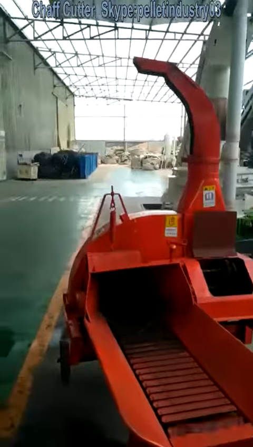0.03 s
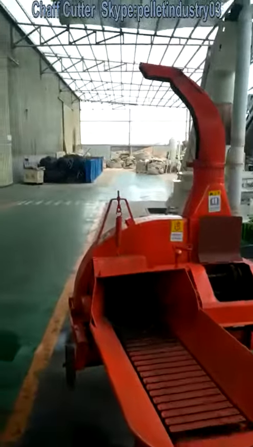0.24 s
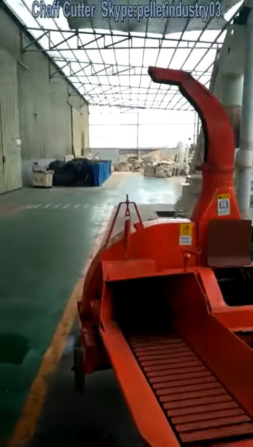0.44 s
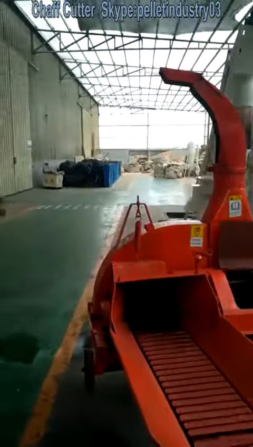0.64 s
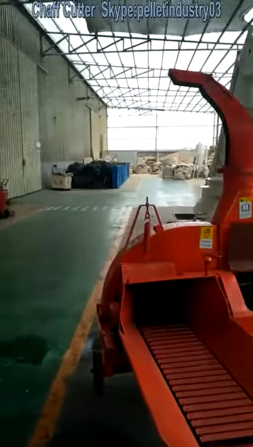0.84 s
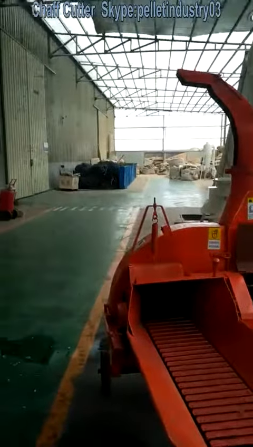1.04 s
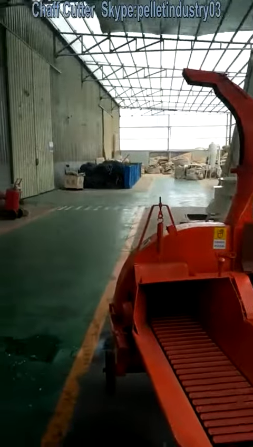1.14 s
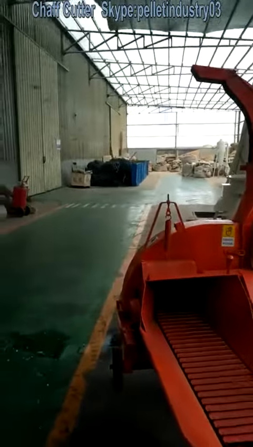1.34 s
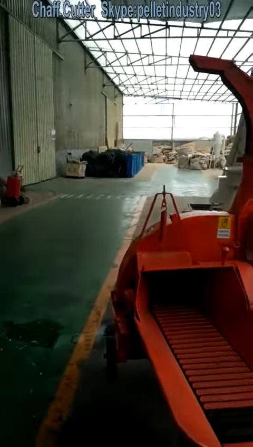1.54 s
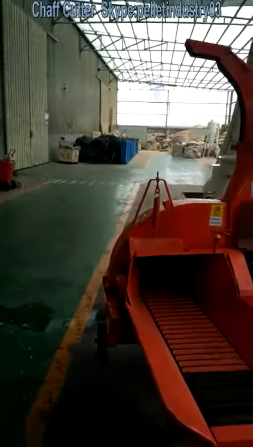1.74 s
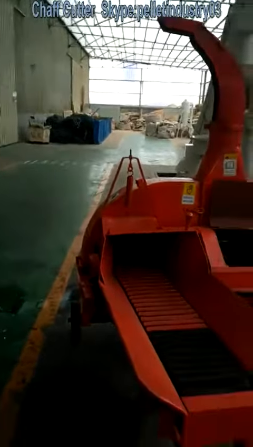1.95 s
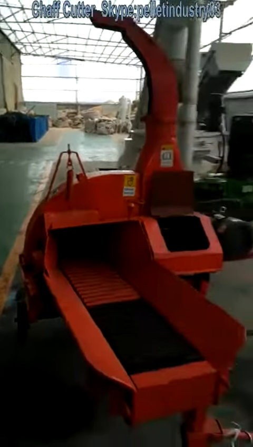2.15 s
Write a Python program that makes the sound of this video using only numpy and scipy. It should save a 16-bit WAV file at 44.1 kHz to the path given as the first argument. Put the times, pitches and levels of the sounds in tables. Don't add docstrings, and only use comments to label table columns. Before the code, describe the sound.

A chaff cutter runs empty, close to a phone in a large shed. Silence until 0.2 s, then a full, noisy roar with low blade-wheel throb swells to about 0.68 s. Noise suppression drops it sharply within a tenth of a second, and the treble keeps thinning. From 0.83 s, bright scraping chain clanks tick irregularly about fourteen times a second, with soft housing knocks and slight reverberation.

```python
import sys
import numpy as np
from scipy import signal
from scipy.fft import rfft, irfft
from scipy.io import wavfile
from scipy.ndimage import uniform_filter1d

SR = 44100
rng = np.random.default_rng(int(sys.argv[2]) if len(sys.argv) > 2 else 0)


def unload_wav(signal):
    wavfile.write(
        sys.argv[1],
        SR,
        np.round(np.clip(np.atleast_2d(signal).T, -1, 1) * 32767).astype(np.int16),
    )


def voltage_ratio(decibels):
    exponent = np.asarray(decibels, float) / 20
    return 10 ** exponent


N = 97020

WHEEL_HZ = 40.39
OPENS_S = 0.2035
SPLIT_HZ = 4850


def level(x, db):
    return x * voltage_ratio(db) / np.sqrt(np.mean(x ** 2))


def read(table, hz, axis=1):
    table = np.array(table, float)
    return np.interp(np.log(hz), np.log(table[:, 0]), table[:, axis])


def walk(rate):
    hold = int(SR / rate)
    steps = np.repeat(rng.standard_normal(N // 100)[:N // hold + 1], hold)
    slewed = uniform_filter1d(uniform_filter1d(steps, hold), hold)[:N]
    return slewed / slewed.std()


def resonance(x, hz, width_hz):
    return signal.lfilter(*signal.iirpeak(hz, hz / width_hz, fs=SR), x)


def blade_wheel(t, phase):
    # multiple, level_db
    wheel_orders = [(1, -22.5), (2, -7.5), (3, -12.5), (4, -1), (5, -8), (6, -9)]
    wheel_db, wobble_db = -32, 0.8
    out = np.zeros(N)
    for multiple, order_db in wheel_orders:
        gain_db = wheel_db + order_db + wobble_db * walk(11.8) + recorder_db(multiple * WHEEL_HZ, t)
        out += voltage_ratio(gain_db) * np.sin(multiple * phase + rng.uniform(0, 2 * np.pi))
    return out


def roar(t, phase, throb_db):
    # pitch_hz, density_db
    roar_colour = [(25, -42), (60, -14.5), (160, -5), (500, -11), (900, -6.5), (5300, -15.5), (10800, -18),
                   (15300, -14)]
    roar_db, flicker_db = -22.5, 1.3
    swell_db = 1.01 * walk(10.28)
    treble_throb_db = 1.4 * np.cos(phase + 0.5)
    f = np.arange(N // 2 + 1) * SR / N + 1e-3
    coloured = irfft(rfft(rng.standard_normal(N)) * voltage_ratio(read(roar_colour, f)), N)
    spectrum = rfft(level(coloured, roar_db))
    out = np.zeros(N)
    lowest, highest = -16, 4
    for band in range(lowest, highest + 1):
        hz = SPLIT_HZ * 2 ** ((band + 0.5) / 2.5)
        mask = np.abs(np.log2(f / hz) * 2.5) < 0.5
        if band == lowest:
            mask |= f < hz
        if band == highest:
            mask |= f > hz
        beat_db = throb_db if hz < SPLIT_HZ else treble_throb_db
        gain_db = beat_db + swell_db + flicker_db * walk(25.16) + recorder_db(hz, t)
        out += irfft(spectrum * mask, N) * voltage_ratio(gain_db)
    return out


def housing(t, throb_db):
    # pitch_hz, width_hz, level_db
    housing_modes = [(279.2, 79, -41), (375.7, 56, -41), (769.5, 47, -43.5), (924, 250, -38),
                     (1238, 224, -38), (2016, 490, -36), (4080, 880, -36.5), (14660, 1600, -36)]
    out = np.zeros(N)
    for hz, width_hz, mode_db in housing_modes:
        tone = resonance(resonance(rng.standard_normal(N), hz, width_hz), hz, width_hz)
        out += level(tone, mode_db) * voltage_ratio(throb_db + 1.8 * walk(14) + recorder_db(hz, t))
    return out


def machine(t):
    phase = 2 * np.pi * np.cumsum(WHEEL_HZ * (1 + 0.0015 * walk(2.1))) / SR
    throb_db = 0.6 * np.cos(phase)
    return blade_wheel(t, phase) + roar(t, phase, throb_db) + housing(t, throb_db)


def scrape_grit(rattle):
    # pitch_hz, level_db
    scrape_colour = [(2500, -6), (4000, -3), (7000, -10), (10500, -7.5), (13000, -2.5), (15500, 2.5)]
    patch_db, band_hz = 3, 1500
    f = np.arange(N // 2 + 1) * SR / N + 1e-3
    spectrum = rfft(rattle) * voltage_ratio(read(scrape_colour, f))
    grit = np.zeros(N)
    for hz in range(2000, 18000, band_hz):
        patch = irfft(spectrum * np.exp(-((f - hz) / band_hz) ** 2), N)
        grit += voltage_ratio(patch_db * walk(33)) * patch
    return level(grit, 0)


def chain():
    # start_s, level_db, low_ring_db, high_ring_db, low_ring_hz
    clanks = [(0.834, -36, -8, -20, 4320), (0.9094, -42, -16, -25, 3730), (0.9802, -35.5, -19, -20, 3850),
              (1.0834, -39, -7, -21, 4140), (1.133, -35.5, -17, -27, 3810), (1.2017, -39.5, -5, -17, 4000),
              (1.278, -36.5, -10, -25, 4300), (1.3319, -45, -21, -16, 4210), (1.3597, -41, -19, -24, 4030),
              (1.4241, -37, -2, -11, 4400), (1.4915, -34.5, -18, -31, 3800), (1.5095, -51.5, 6, -20, 4370),
              (1.5736, -38, -4, -12, 3900), (1.6432, -45, -5, -17, 4260), (1.6641, -45.5, -8, -20, 4300),
              (1.7215, -41, -16, -11, 4320), (1.7924, -37.5, -9, -6, 4400), (1.8677, -35, -14, -13, 4430),
              (1.9165, -44, -6, -17, 4200), (1.94, -35, -13, -6, 4500), (2.015, -37.5, -20, -9.5, 3820),
              (2.0827, -40, -4.5, -6, 4380), (2.1617, -40, -3, -5, 4450)]
    scrape_db, scrape_hold_s, scrape_t60_s = -10, 0.006, 0.043
    click_db, click_s, rattle_t60_s = 7, 0.002, 0.11
    ring_db, ring_lag_s = -0.5, 0.0043
    low_width_hz, high_ring_hz, high_width_hz = 290, 5500, 340
    tick_hz, tick_width_hz, tick_db = 15640, 1100, 1

    size = SR // 5
    t = np.arange(size) / SR
    rattle = rng.standard_normal(N) * voltage_ratio(2.5 * walk(360))
    grit = np.append(scrape_grit(rattle), np.zeros(size))
    rattle = np.append(rattle, np.zeros(size))

    click = click_db * np.exp(-t / click_s)
    scrape_fall = -60 * np.clip(t - scrape_hold_s, 0, None) / scrape_t60_s
    scrape = voltage_ratio(scrape_fall + click) * np.clip(t / 0.00043, 0, 1)
    shake = voltage_ratio(-60 * t / rattle_t60_s + click) * np.clip(t / 0.00044, 0, 1)
    late = np.clip(t / ring_lag_s, 0, 1) ** 2

    out = np.zeros(N + size)
    for start_s, clank_db, low_db, high_db, low_hz in clanks:
        i = int(start_s * SR)
        contact = rattle[i:i + size]
        push = contact * shake
        low = resonance(push, low_hz, low_width_hz)
        high = resonance(push * late, high_ring_hz, high_width_hz)
        tick = resonance(contact * scrape, tick_hz, tick_width_hz)
        rings = voltage_ratio(low_db) * low / np.abs(low).max()
        rings += voltage_ratio(high_db) * high / np.abs(high).max()
        rings += voltage_ratio(tick_db) * tick / np.abs(tick).max()
        scraping = voltage_ratio(scrape_db) * scrape * grit[i:i + size]
        out[i:i + size] += voltage_ratio(clank_db) * (scraping + voltage_ratio(ring_db) * rings)
    return out[:N]


def knocks(t):
    # start_s, pitch_hz, level_db, t60_s
    knock_rings = [
        (.69, 5170, -32, .25),
        (.84, 240, -39, .2),
        (1.045, 285, -34, .18),
        (1.125, 470, -39, .18),
        (1.135, 520, -39, .16),
        (1.14, 585, -38, .18),
        (1.44, 620, -40, .12),
        (1.445, 730, -37, .16),
    ]
    out = np.zeros(N)
    for start_s, hz, knock_db, t60_s in knock_rings:
        since = t - start_s
        decay = voltage_ratio(knock_db - 60 * np.clip(since, 0, None) / t60_s)
        out += decay * np.clip(since / 0.023, 0, 1) * np.sin(2 * np.pi * hz * t)
    return out


def gears(t):
    hz, width_hz, gear_db = 2130, 420, -56
    turn_s, turn_length_s = 1.62, 0.1
    band = resonance(resonance(rng.standard_normal(N), hz, width_hz), hz, width_hz)
    return level(band, gear_db) * voltage_ratio(2.0 * walk(20)) * np.clip((t - turn_s) / turn_length_s, 0, 1)


def hall(x):
    hall_db, hall_t60_s = -18.5, 0.42
    t = np.arange(SR // 2) / SR
    tail = rng.standard_normal(len(t)) * voltage_ratio(-60 * t / hall_t60_s) * np.clip(t / 0.019, 0, 1)
    return signal.fftconvolve(x, tail / np.sqrt(np.sum(tail ** 2)))[:N] * voltage_ratio(hall_db)


def recorder_db(hz, t):
    # time_s, gain_db
    fade_up = [(.205, -19), (.215, -11.5), (.26, -10), (.28, -6), (.335, -5), (.35, -2), (.45, 1.5),
               (.6, 0.5), (.68, 0.5)]
    # pitch_hz, first_duck_db, later_tightening_db
    suppressor = [(60, -15, -2), (210, -16.5, -2), (729, -18, -2.5), (2040, -17.5, -8), (2920, -17, -12.5),
                  (4500, -18, -19), (7660, -13.5, -23.5), (14100, -14, -23)]
    duck_s, tighten_s = 0.6765, 0.56
    bass_step_db, bass_fall_s = -7.5, 0.083
    treble_wait_s, treble_fall_s = 0.04, 0.059
    late_db, late_s, late_below_hz = -4.5, 0.089, 354

    since = t - duck_s
    duck_db = read(suppressor, hz)
    if hz < SPLIT_HZ:
        fall = bass_step_db * np.clip(since / 0.004, 0, 1)
        fall += (duck_db - bass_step_db) * np.clip(since / bass_fall_s, 0, 1)
    else:
        fall = duck_db * np.clip((since - treble_wait_s) / treble_fall_s, 0, 1)
    tightened = 1 - np.exp(-np.clip(since - bass_fall_s, 0, None) / tighten_s)
    tighten = read(suppressor, hz, axis=2) * tightened
    late = late_db * (hz < late_below_hz) * np.exp(-np.clip(t - OPENS_S, 0, None) / late_s)
    return np.interp(t, *np.array(fade_up).T) + late + fall + tighten


def scene():
    t = np.arange(N) / SR
    hits = chain() + knocks(t)
    return (machine(t) + hits + hall(hits) + gears(t))[None]


def band_limit(x):
    return signal.sosfilt(signal.butter(12, 16950, fs=SR, output="sos"), x)


def record(dry):
    top_hz = 15720
    t = np.arange(N) / SR
    f = np.arange(N // 2 + 1) * SR / N
    opened = dry * np.clip((t - OPENS_S) / 0.003, 0, 1)
    cut_db = -45 * np.clip((f - top_hz) / 120, 0, 1) - 20 * np.clip((f - top_hz) / 1000, 0, 1)
    mix = irfft(rfft(opened) * voltage_ratio(cut_db), N)
    mix = mix * (t > OPENS_S - 0.002)
    return band_limit(mix)


dry = scene()
out = record(dry)
unload_wav(out)
```